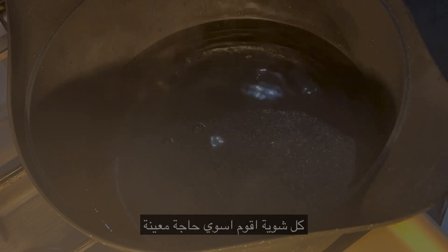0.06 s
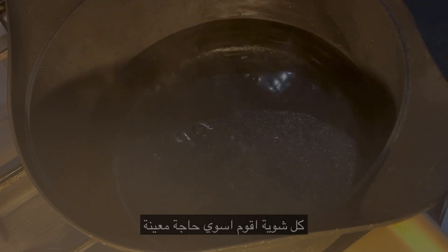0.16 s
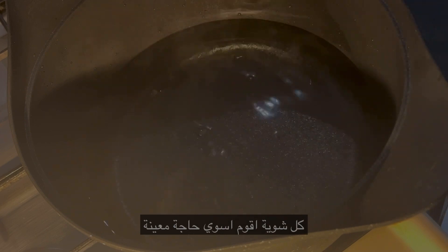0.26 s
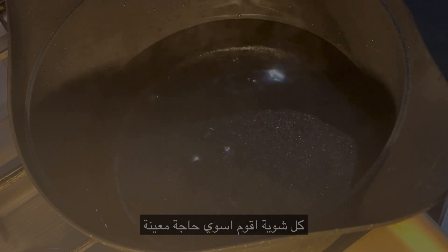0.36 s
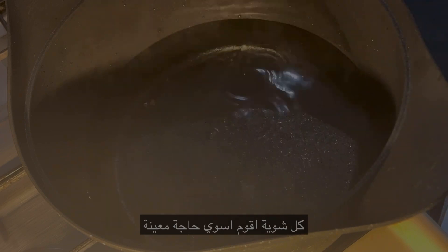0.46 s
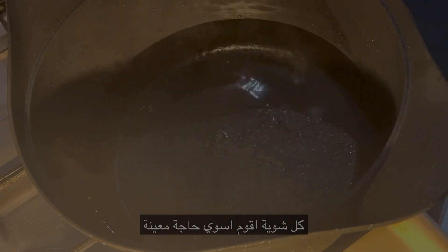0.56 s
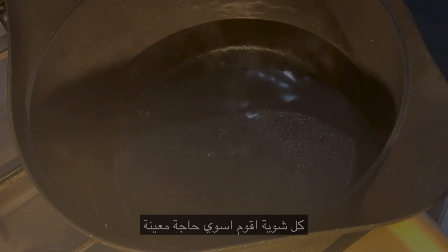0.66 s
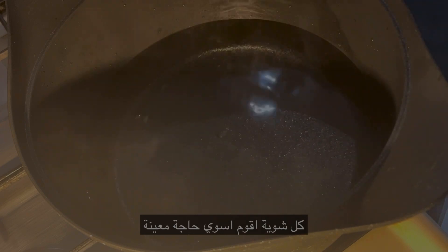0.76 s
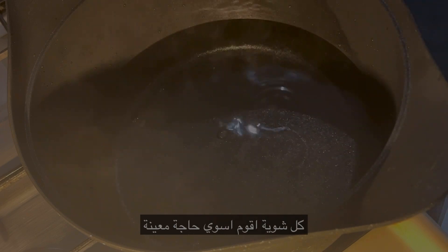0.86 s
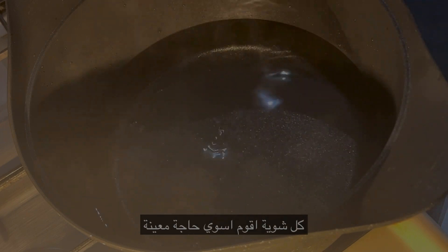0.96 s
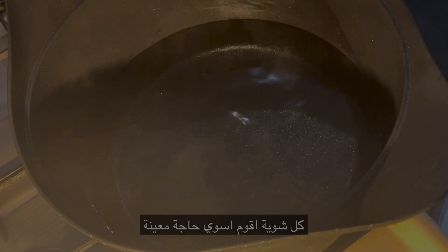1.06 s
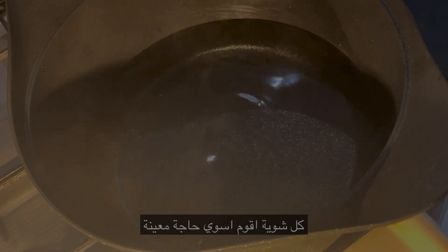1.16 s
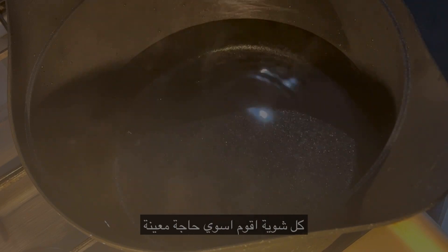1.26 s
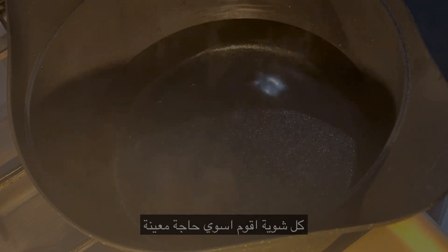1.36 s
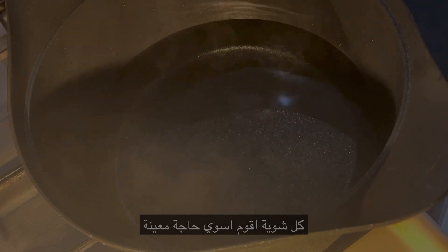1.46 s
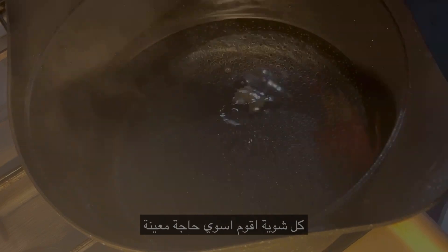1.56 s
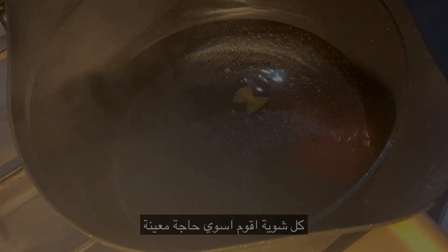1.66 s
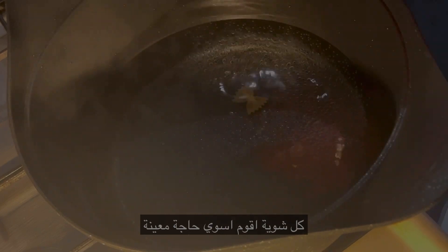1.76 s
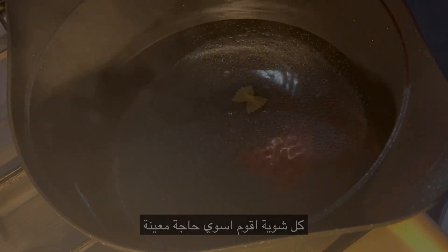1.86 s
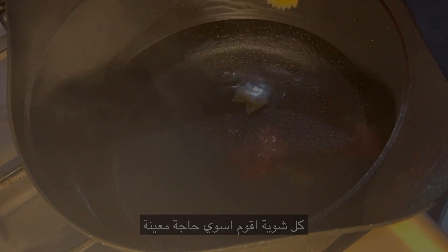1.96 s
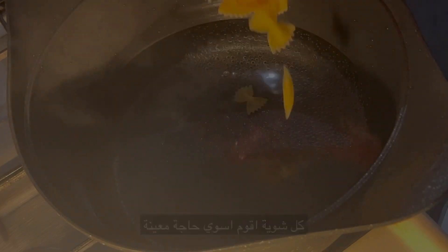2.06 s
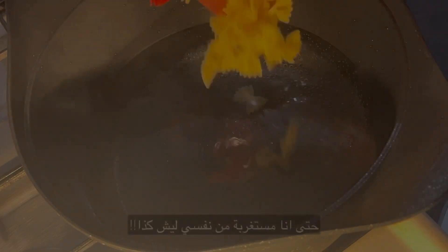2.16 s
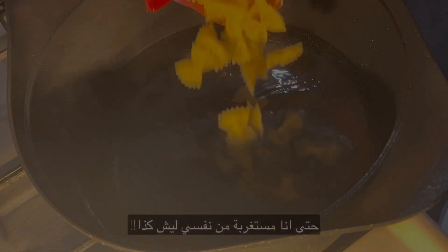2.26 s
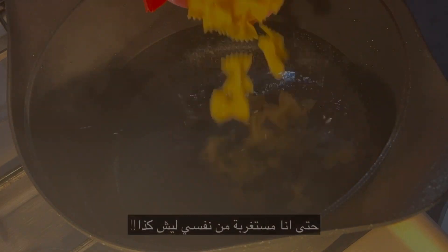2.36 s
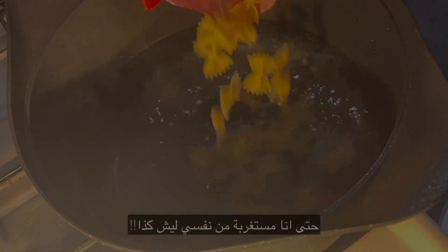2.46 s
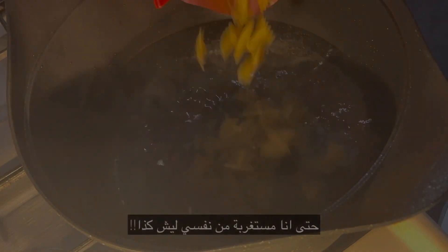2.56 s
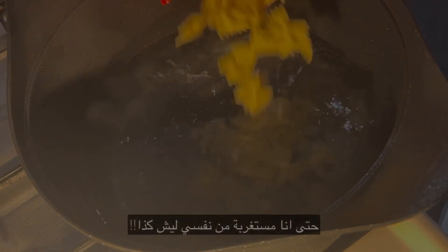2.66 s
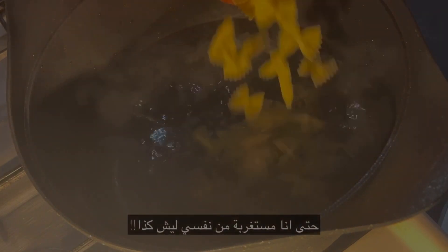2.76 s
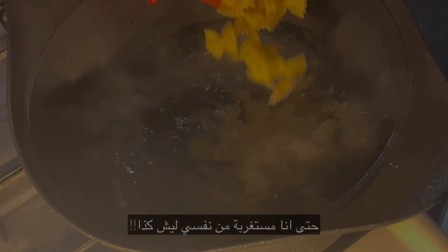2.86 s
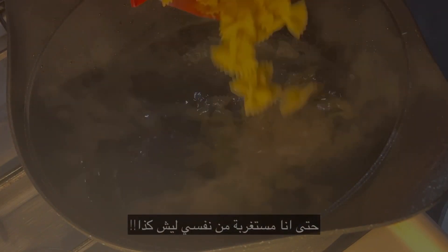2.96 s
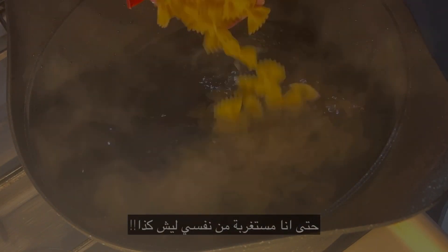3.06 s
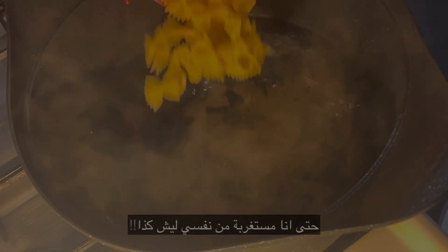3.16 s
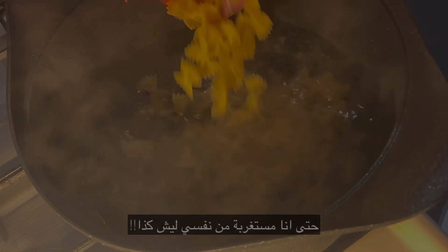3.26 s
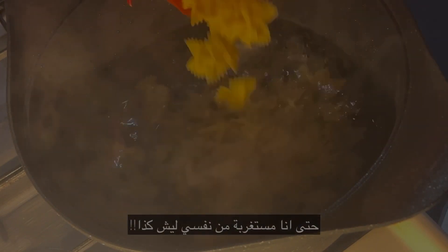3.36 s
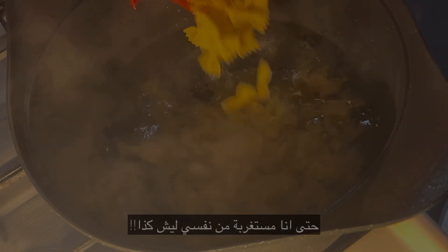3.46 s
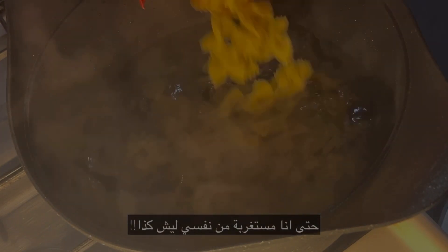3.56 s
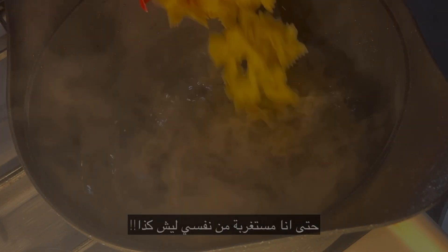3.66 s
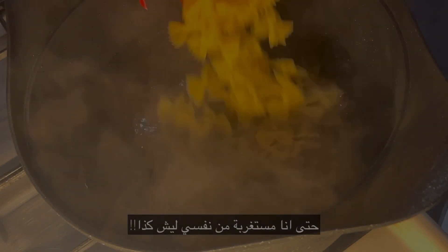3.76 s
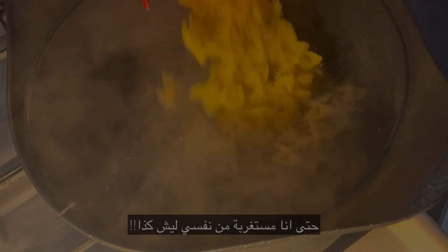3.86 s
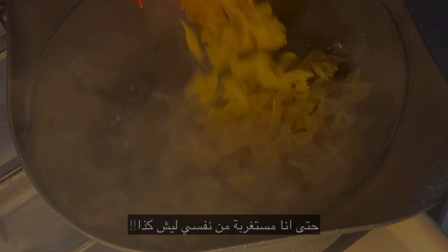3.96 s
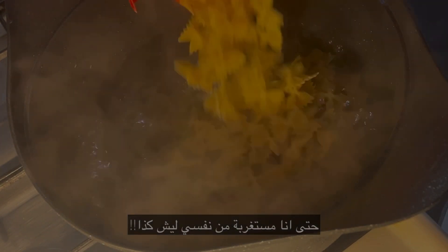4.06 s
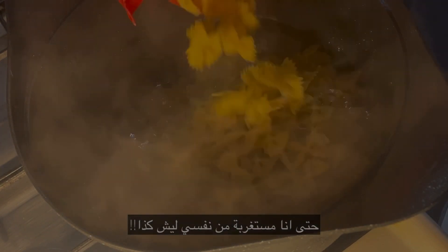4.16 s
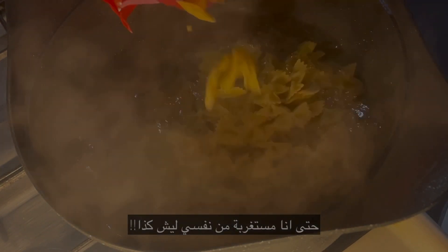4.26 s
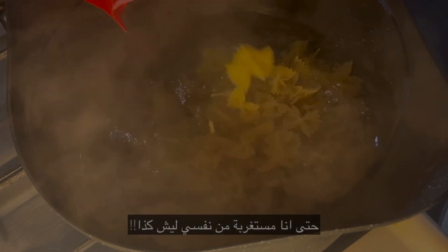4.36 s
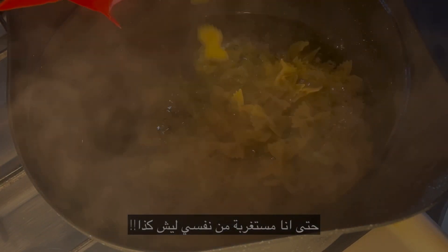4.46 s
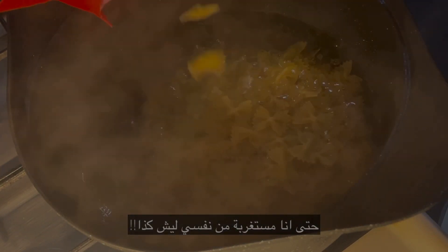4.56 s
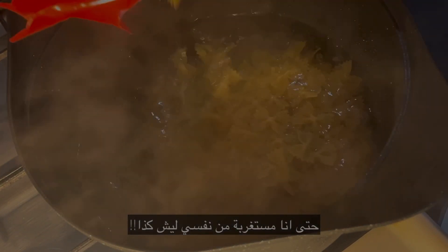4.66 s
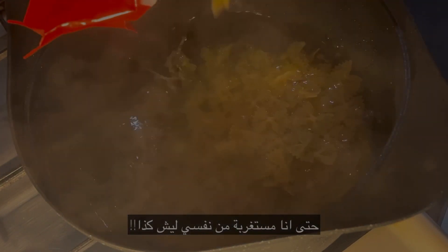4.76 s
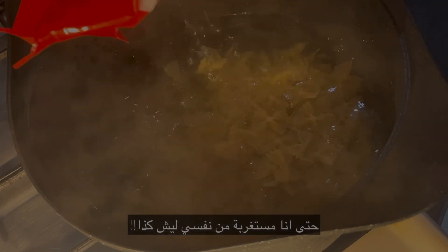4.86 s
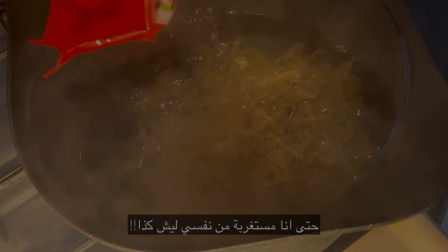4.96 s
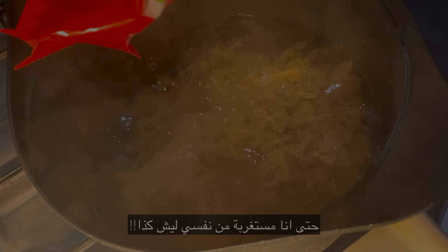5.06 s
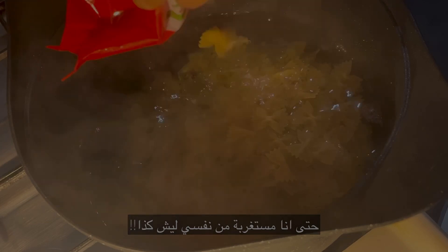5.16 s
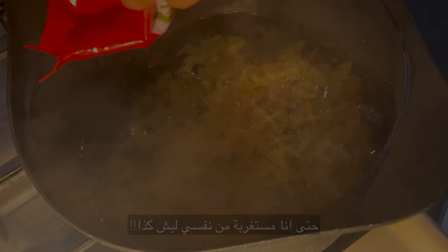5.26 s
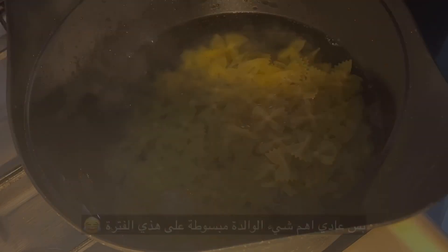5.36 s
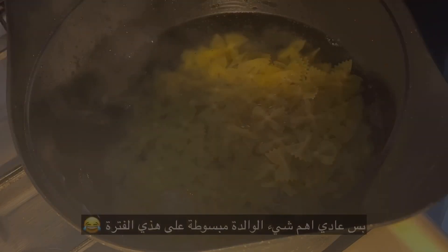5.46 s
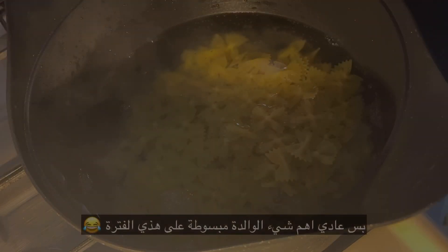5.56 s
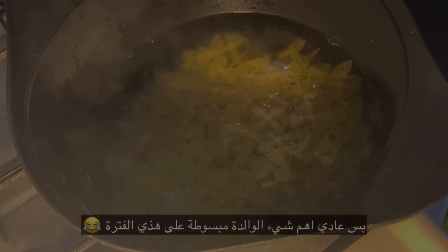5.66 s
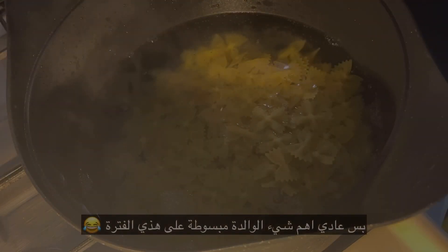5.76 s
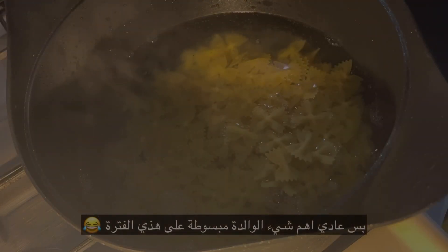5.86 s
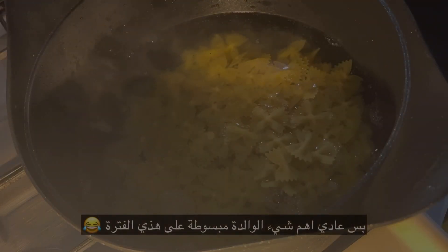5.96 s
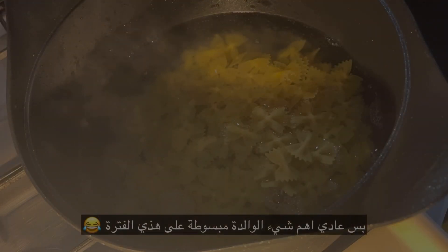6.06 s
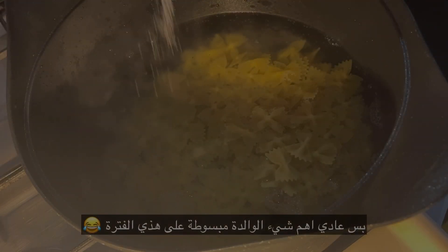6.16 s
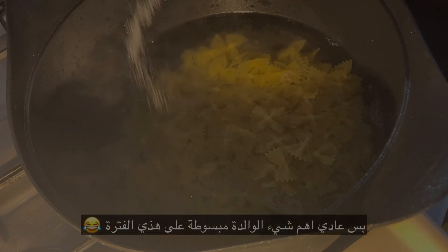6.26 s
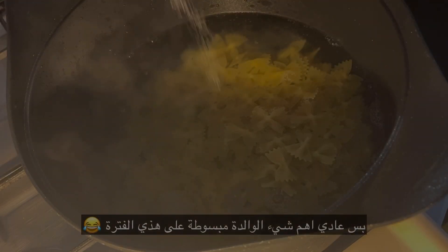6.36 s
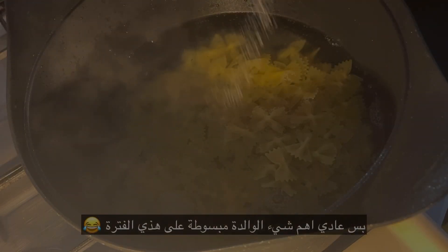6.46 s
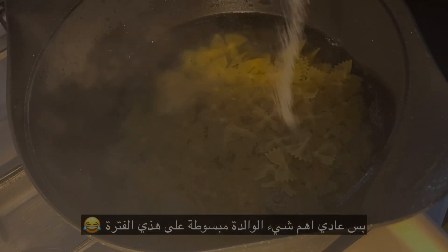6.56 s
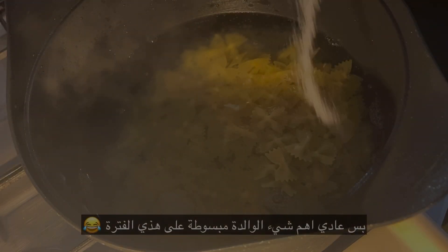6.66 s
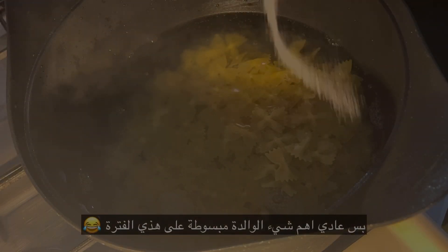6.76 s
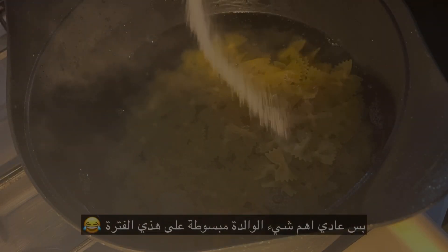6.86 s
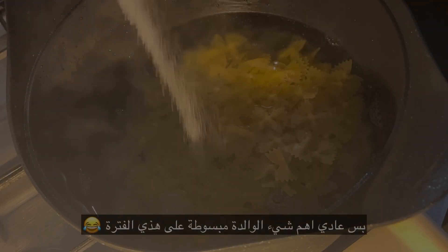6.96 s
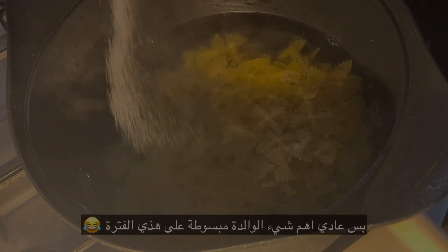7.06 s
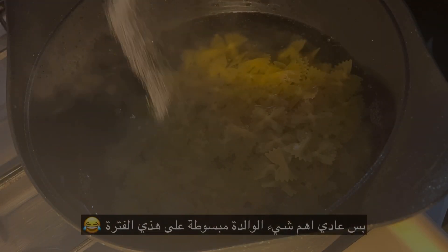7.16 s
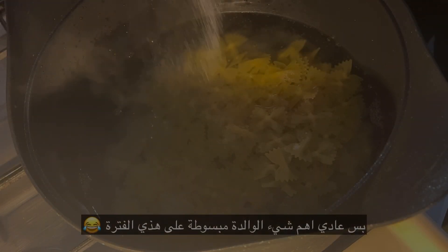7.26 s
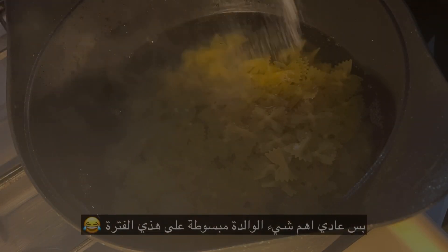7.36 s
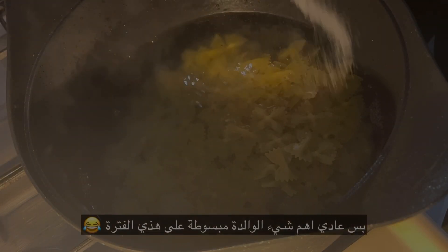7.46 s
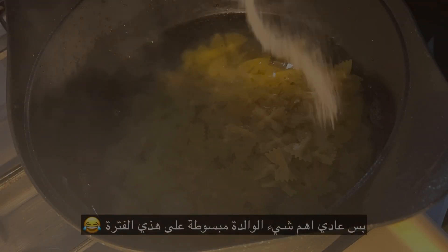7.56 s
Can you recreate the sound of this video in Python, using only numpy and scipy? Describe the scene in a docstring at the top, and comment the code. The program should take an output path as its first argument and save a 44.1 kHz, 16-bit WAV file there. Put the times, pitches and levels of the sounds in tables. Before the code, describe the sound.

Dry pasta pours from a crinkling bag into hot water, clicking against the pot, followed by a faint hiss of salt while the stove hums.

```python
"""A small kitchen: dry bow-tie pasta is tipped from a plastic bag into a pot of simmering water.
The stove hums, its burner rushes and tiny bubbles fizz. After a soft scuff, the bag is lifted with a
rustle and dull bumps, and its creases snap. Pasta rattles out, clicks on the pot and makes it ring,
then splashes in and traps air that rings as bubbles. Last, salt hisses in over the hum and the fizz.
It is all heard through two close microphone openings, called ports."""
import sys
import numpy as np
from scipy import signal
from scipy.fft import rfft, irfft, next_fast_len
from scipy.io import wavfile
from scipy.ndimage import uniform_filter1d, map_coordinates

SR = 44100
rng = np.random.default_rng(int(sys.argv[2]) if len(sys.argv) > 2 else 0)


def int16_out(signal):
    """Quantize to a 16-bit WAV file."""
    q = np.round(np.clip(np.atleast_2d(signal).T, -1, 1) * 32767)
    wavfile.write(sys.argv[1], SR, q.astype(np.int16))


N = 336218
T = np.arange(N) / SR  # the time of each sample, in seconds
LIFT_S, POUR_START_S, POUR_END_S = 0.908, 1.563, 5.32

# In all names, fade_s is the time a sound takes to die away by 60 dB.
# Levels in a table compare its rows; the functions may add a gain of their own.
# overtones of the stove's deep hum after the pour: pitch_hz, level_db
HUM_OVERTONES = [(118.4, -52.5), (177.6, -60)]
# tone colour of the burner's rush: frequency_hz, level_db
BURNER_COLOUR = [(25, -32), (48, 6), (90, 1), (140, -1), (220, -7), (320, -12), (500, -19), (750, -23),
                 (1100, -19), (1260, -15), (1450, -29), (2000, -30.5), (4000, -35), (15000, -79.5)]
# the burner's faint singing, before and after the pour ends: pitch_hz, width_hz, level_db
SINGING_BANDS = [(1232, 49, -64.5), (1320, 106, -62.5)]
# tone colour of the water's fizz: frequency_hz, level_db
FIZZ_COLOUR = [(1000, -8), (2500, -11), (5000, -2.5), (8000, -3), (12500, -3), (15500, -3)]
# swells of hiss, first from the hot water, then from salt: middle_s, length_s, level_db
HISS_SWELLS = [(0.538, 0.38, -62), (5.928, 0.26, -50), (6.147, 0.1, -52.5), (6.56, 0.3, -60.5),
               (6.907, 0.21, -59.5)]
# tone colour of the scuff: frequency_hz, level_db
SCUFF_COLOUR = [(150, -1), (450, 4), (1000, 5), (2100, -1.5), (2800, -7), (5000, -17.5), (12000, -34)]
# tugs at the bag: start_s, click_db, rustle_db, rustle_fade_s
BAG_TUGS = [(0.9082, -26.5, -42, 0.45), (1.0715, -27, -48, 0.92), (1.271, -25, -37, 0.47),
            (1.4388, -30, -37, 0.58)]
# tone colour of the bag rubbing: frequency_hz, level_db
RUB_COLOUR = [(40, -18), (100, 10.5), (250, -2), (400, 0), (600, -6), (1000, -10.5), (2000, -12),
              (4000, -18.5), (10000, -47)]
# tone colour of the bag rustling: frequency_hz, level_db
RUSTLE_COLOUR = [(500, 2.5), (1500, 1), (4500, 1), (8000, -2.5), (12500, -10), (15500, -24)]
# single pieces of pasta that hit the pot: start_s, level_db, knock_offset_db
PASTA_HITS = [(1.6315, -40, -6), (1.675, -34, -4), (1.6845, -20, -11.5), (1.7815, -28, -4),
              (1.8145, -26.5, -10), (1.8402, -23.5, -11), (1.9793, -10.5, -18), (2.064, -9.5, -12.5),
              (2.2145, -14.5, -20), (2.297, -26, -2), (2.4277, -15.5, -23), (2.4435, -13, -12.5),
              (2.4835, -25.5, -5.5), (2.6898, -17.5, -8.5), (2.7099, -11.5, -14), (2.672, -19.5, -6.5),
              (2.9188, -14.5, -5.5), (2.9324, -10.5, -18), (3.0009, -14.5, -9.5), (3.1024, -14.5, -16),
              (3.2163, -13.5, -12), (3.2345, -17, -4.5), (3.3214, -22.5, -1), (3.3909, -14, -12),
              (3.5396, -8, -24.5), (3.6775, -10.5, -15), (3.9365, -13.5, -14.5), (4.4577, -21.5, -8.5),
              (4.675, -29, -0.5), (4.7555, -22.5, -12), (4.8335, -26.5, -1.5), (4.886, -38, 3.5),
              (5.0924, -46, 5), (5.106, -38.5, 6), (5.12, -31.5, 2), (5.2051, -34.5, 6.5),
              (5.2773, -33.5, 6), (5.305, -29, -3)]
# the notes a dry piece rings with: pitch_hz, level_db, fade_s
PASTA_NOTES = [(1540, -3, 0.015), (3325, 7, 0.0039), (5030, 0, 0.011)]
# the notes of the pot above the water: pitch_hz, width_hz, level_db
POT_NOTES = [(839, 24, -3.5), (1027, 214, 3), (1853, 310, 6), (2190, 30, -3), (2945, 43, 4.5),
             (3570, 56, 0.5), (3875, 180, 2), (4150, 77, 4.5), (4690, 270, 3)]
# dull bumps against the stove: start_s, level_db, deep_offset_db, boom_offset_db
STOVE_BUMPS = [(0.986, -25, -27, 0.5), (1.052, -14.5, -5, -8.5), (1.094, -12, -2.5, -16),
               (1.192, -8, -10, -19), (1.272, 1, -4.5, -4), (1.287, -5.5, -18, -26), (1.347, -16, -29, 11),
               (1.431, -26, 3, 2), (1.52, -29.5, -6, 5.5)]
# the notes of the bumped stove, deep note first and boom second: pitch_hz, level_db, fade_s
STOVE_NOTES = [(67, 6, 0.37), (128.2, 7.5, 0.28), (102, -1, 0.15), (222, -4.5, 0.21), (292, -9, 0.18),
               (389, -15.5, 0.29), (775.5, -18.5, 0.15)]
# tone colour of a bump's knock: frequency_hz, level_db
KNOCK_COLOUR = [(100, 2), (280, -2), (520, 2), (900, -29), (2300, -3), (5000, -27), (12000, -45)]
# scrapes that start some of the bumps: start_s, level_db, fade_s, pitch_hz, width_hz
BUMP_SCRAPES = [(0.986, -39, 0.33, 750, 260), (1.094, -39, 0.39, 860, 200)]
# sharp snaps of creases in the packaging: start_s, level_db, pitch_hz, run_s
CREASE_SNAPS = [(1.193, -38, 3500, 0.0024), (1.2755, -20, 4040, 0.0026), (2.0245, -30.5, 8450, .001),
                (2.101, -16.5, 6900, 0.0045), (2.2965, -21, 7600, 0.0037), (2.3374, -18, 8000, .002),
                (2.3757, -8, 8530, .0005), (2.49, -19, 12500, .001), (2.5216, -13.5, 8500, 0.00098),
                (2.7603, -10.5, 11900, .0005), (2.841, -15.5, 9680, .002), (3.3455, -10, 7340, 0.0014),
                (3.8527, -6.5, 7740, 0.00095), (4.063, -10.5, 12800, .003), (4.1656, -14, 7900, 0.0024),
                (4.3244, -17.5, 5040, 0.0021), (4.438, -14.5, 8450, .004), (4.519, -18, 11800, 0.00064),
                (4.53, -26, 14160, .001), (4.555, -19, 11500, .002), (4.573, -32.5, 13000, .002),
                (4.5975, -20, 8700, 0.0012), (4.603, -22.5, 8600, .002), (4.628, -16, 7500, 0.00088),
                (4.635, -25, 12100, 0.0009), (4.644, -26.5, 7200, 0.0013), (4.654, -24, 8050, 0.0018),
                (4.661, -23, 4500, .001), (4.7518, -29, 12700, 0.0009), (4.755, -21, 11700, 0.0018),
                (4.8215, -26, 8000, 0.0015), (4.8345, -22.5, 11900, 0.0014), (5.143, -35, 12600, .002),
                (5.216, -23.5, 7800, 0.0025), (5.2553, -13.5, 12600, 0.00029), (6.95, -39.5, 12500, .0003)]
# the bag crinkles as it is tipped, then as it is shaken empty: start_s, stop_s, level_db
CRINKLE_SPELLS = [(1.701, 2.595, -34), (4.385, 4.71, -36.5)]
# how thickly the pasta streams from the bag: time_s, flow_db
PASTA_FLOW = [(1.64, -56.5), (1.7, -45), (1.9, -43), (2.02, -38), (2.22, -41), (2.42, -34), (2.62, -34.5),
              (2.78, -31.5), (2.98, -37), (3.17, -35.5), (3.33, -29.5), (3.51, -32), (3.6, -24.5),
              (3.9, -21.5), (4.22, -30), (4.32, -30), (4.38, -38), (4.62, -47), (4.95, -56), (5.29, -52.5)]
# tone colour of dry pasta rattling: frequency_hz, level_db
RATTLE_COLOUR = [(300, -15.5), (800, -3.5), (2000, -1.5), (2500, 4), (4200, 1.5), (6500, 0), (9500, 1),
                 (15500, -3)]
# tone colour of the splashing: frequency_hz, level_db
SPLASH_COLOUR = [(40, -11), (95, 6), (175, 1), (450, -1.5), (700, -2.5), (1100, 0), (1900, -5.5),
                 (3000, -32), (8000, -53)]
# clumps of pieces that land together: start_s, rattle_db, pot_db, splash_db
PASTA_CLUMPS = [(1.777, -51, -58, -33.5), (1.922, -48, -52, -35.5), (1.994, -37.5, -41, -28.5),
                (2.068, -40, -50, -35), (2.297, -41.5, -42, -47), (2.38, -36, -48, -40),
                (2.512, -30.5, -30.5, -33.5), (2.562, -33.5, -30, -25.5), (2.667, -29, -27.5, -31),
                (2.768, -23.5, -25, -31), (2.824, -21.5, -29, -41), (2.846, -33.5, -29, -34),
                (2.917, -23, -29, -24.5), (3.236, -26, -25, -35), (3.283, -27, -32, -37.5),
                (3.324, -21, -25, -46), (3.447, -18.5, -22.5, -34), (3.535, -19.5, -28, -29),
                (3.69, -22.5, -19.5, -36.5), (3.776, -17.5, -19.5, -29.5), (3.855, -17, -21.5, -31),
                (3.896, -35.5, -29.5, -28.5), (3.935, -19.5, -25.5, -39.5), (4.02, -21, -25, -49),
                (4.059, -20.5, -21, -42), (4.09, -16, -24.5, -32.5), (4.157, -18, -21.5, -32),
                (4.255, -21.5, -24.5, -42), (4.301, -21.5, -39, -49), (4.412, -25, -37, -52)]
# pieces that ring clearly on a hard edge: start_s, level_db, pitch_hz
PASTA_PINGS = [(1.979, -23.5, 3230), (2.2148, -27, 3280), (2.339, -22.5, 4570), (2.427, -19, 5130),
               (2.692, -17, 3300), (3.679, -13.5, 4300), (4.628, -25, 3820)]
# larger air pockets pulled under by falling pieces: start_s, level_db, pitch_hz
AIR_POCKETS = [(1.984, -18.5, 1430), (2.447, -22, 262), (2.4824, -18, 1110), (3.235, -27, 960),
               (4.462, -24, 1040), (4.833, -22, 1480), (4.834, -27.5, 1050), (5.023, -33.5, 288),
               (5.283, -24, 1490), (5.307, -27, 1000)]
# how long the kitchen echoes: frequency_hz, fade_s
ECHO_FADES = [(150, 0.72), (1000, 0.37), (4000, 0.092), (14000, 0.013)]
# how far the wave at the left port runs ahead of the right: frequency_hz, lead_radians
PORT_LEAD = [(0, 0), (400, -.55), (900, -.25), (1810, .05), (2580, 2.4), (3300, 1.2), (3900, .9),
             (4600, 1.45), (5150, 1.4), (5900, 3.14), (6700, 4.3), (7700, 6.25), (8400, 6.3), (9700, 9.3),
             (10700, 9.5), (11850, 12.5), (13000, 12.6), (14000, 15.4), (15700, 16.2)]
# level at the left port compared with the right: frequency_hz, offset_db
PORT_LEVELS = [(200, 0), (450, -1.3), (750, -2.2), (1100, -1.2), (1600, 0)]


def amp(db):
    """Turn decibels into a gain to multiply by."""
    return 10 ** (np.asarray(db) / 20)


def fade(t, fade_s, level_db=0):
    """A gain that starts at level_db and drops 60 dB every fade_s."""
    return amp(level_db - 60 * t / fade_s)


def rise(t, rise_s):
    """A gain that climbs from 0 towards 1, most of the way within rise_s."""
    return 1 - np.exp(-t / rise_s)


def burst(start_s, rise_s, fade_s):
    """A gain that rises at start_s and dies away."""
    age = np.maximum(T - start_s, 0)
    return rise(age, rise_s) * fade(age, fade_s)


def sine(hz, t):
    """A pure tone."""
    return np.sin(2 * np.pi * hz * t)


def unit(x):
    """Scale a sound to an average (rms) level of 1."""
    return x / np.sqrt(np.mean(x ** 2) + 1e-20)


def unit_energy(x):
    """Scale a short sound to an energy of 1, averaged over the ports."""
    return unit(x) / np.sqrt(x.shape[-1])


def along(points, hz):
    """Read between the rows of a (frequency_hz, value) table, on a log frequency scale."""
    frequencies, values = np.transpose(points)
    return np.interp(np.log(hz + 1), np.log(frequencies + 1), values)


def between(start_s, stop_s):
    """A gain of 1 between two times and 0 outside, with quick edges."""
    return uniform_filter1d(((T >= start_s) & (T < stop_s)) * 1., size=200)


def wobble(per_s):
    """A smooth curve through per_s random values a second."""
    return map_coordinates(rng.standard_normal(int(N * per_s / SR) + 4), [T * per_s])


def add(track, start_s, sound):
    """Mix a sound into a track at start_s."""
    stretch = track[..., max(round(start_s * SR), 0):][..., :sound.shape[-1]]
    stretch += sound[..., :stretch.shape[-1]]


def filtered(x, response):
    """Multiply each frequency in a sound by response(hz)."""
    size = next_fast_len(N + SR // 4)
    return irfft(rfft(x, size) * response(np.fft.rfftfreq(size, 1 / SR)), size)[..., :N]


def coloured(x, colour):
    """Give a sound a tone colour and an average level of 1."""
    return unit(filtered(x, lambda hz: amp(along(colour, hz))))


def noise(size=N):
    """White noise at the two ports, mostly shared."""
    return rng.standard_normal(size) + amp(-5) * rng.standard_normal((2, size))


def narrow_noise(hz, width_hz, size=N):
    """Noise gathered around one pitch."""
    return unit(signal.lfilter(*signal.iirpeak(hz, hz / width_hz, SR), rng.standard_normal(size)))


def grains(per_s, low_hz, high_hz, cycles, spread_db, size, glide=0):
    """Tiny random rings, size samples each; more per second makes them denser but no louder."""
    per_s = per_s * np.ones(N)
    starts = np.flatnonzero(rng.random(N) < per_s / SR)
    place, strength, life = rng.random((len(starts), 3)).astype(np.float32).T[:, :, None]
    hz = low_hz + (high_hz - low_hz) * place
    t = np.arange(size, dtype=np.float32) / SR
    age = t * hz / (cycles * (.5 + life))
    rings = sine(hz * (1 + glide * rise(age, 2)), t) * np.exp(-age)
    level_db = spread_db * np.minimum(-np.log(1 - strength), np.pi)
    rings *= amp(level_db) / np.linalg.norm(rings, axis=1, keepdims=True)
    rings /= np.sqrt(per_s[starts, None])
    samples = starts[:, None] + np.arange(size)
    return unit(np.bincount(samples.ravel(), rings.ravel(), N + size)[:N])


def stove_hum(mains_hz=59.2, beat_hz=3.02):
    """The stove buzzes at multiples of the mains frequency, deeper after the pour; its burner rushes."""
    def tone(hz, db):
        return np.sqrt(2) * amp(db) * np.sin(2 * np.pi * hz * T + .25 * wobble(5))

    # the buzz throbs evenly until the bag is lifted, then wavers at a lower level
    beat = 1 + 0.56 * np.cos(2 * np.pi * beat_hz * T)
    buzz_gain = np.where(T < LIFT_S, amp(-45) * beat, amp(-49 + wobble(13)))
    buzz = buzz_gain * (tone(2 * mains_hz, 0) + tone(3 * mains_hz, -15))
    deep_db = -40 + 0.31 * wobble(4.18) - 2.5 * np.maximum(T - POUR_END_S, 0)  # sinks 2.5 dB a second
    hum = tone(mains_hz, deep_db) + sum(tone(hz, db + 0.3 * wobble(2.7)) for hz, db in HUM_OVERTONES)
    rush = amp(np.where(T < POUR_END_S, -46, -46.5)) * coloured(noise(), BURNER_COLOUR)
    after = between(POUR_END_S, np.inf)
    return (1 - after) * buzz + after * hum + rush


def burner_singing():
    """The burner sings faintly in a narrow band of noise, a little higher once the pour is over."""
    before, after = [amp(db) * narrow_noise(hz, width_hz) for hz, width_hz, db in SINGING_BANDS]
    band = signal.butter(2, [900, 1700], "band", fs=SR, output="sos")
    return signal.sosfilt(band, np.where(T < POUR_END_S, before, after))


def water_fizz():
    """Tiny bubbles burst in the hot water; the hiss swells and fades, most when salt is added."""
    steady = amp(np.where(T < POUR_END_S, -71.5, -64.5) + 0.29 * wobble(6.6))
    swells = sum(amp(db) * np.exp(-np.abs(2 * (T - middle_s) / length_s) ** 3)
                 for middle_s, length_s, db in HISS_SWELLS)
    pops = grains(2500, 2200, 13500, cycles=5.1, spread_db=1.5, size=150)
    return np.hypot(steady, swells) * coloured(pops + noise(), FIZZ_COLOUR)


def scuff(start_s=0.107):
    """A soft, dull scuff somewhere in the kitchen: a tap and a longer fade."""
    tap = amp(-49) * burst(start_s, rise_s=0.001, fade_s=0.018)
    tail = amp(-43) * burst(start_s, rise_s=0.0036, fade_s=0.77)
    return (tap + tail) * coloured(noise(), SCUFF_COLOUR)


def bag_rub(free_s=1.327, rise_db_per_s=46, fall_db_per_s=57):
    """The lifted bag rubs hardest as it comes free, with extra rubbing after each bump."""
    drag = amp(-29.5 - np.maximum(rise_db_per_s * (free_s - T), fall_db_per_s * (T - free_s)))
    jolts = sum(amp(db - 24.5) * burst(start_s, rise_s=0.004, fade_s=0.24)
                for start_s, db, _, _ in STOVE_BUMPS)
    rough_noise = noise() * amp(0.87 * wobble(110))
    return np.hypot(drag, jolts) * coloured(rough_noise, RUB_COLOUR)


def bag_rustle():
    """Each tug sets off a dying rustle of tiny crackles in the plastic."""
    crackles = grains(1500, 1000, 15000, cycles=2.5, spread_db=3, size=200)
    tugs = sum(amp(db) * burst(start_s, 0.0077, fade_s) for start_s, _, db, fade_s in BAG_TUGS)
    return tugs * coloured(crackles + noise(), RUSTLE_COLOUR)


def pot_ring(x):
    """The pot rings at its own notes when a sound strikes it."""
    return filtered(x, lambda hz: sum(
        amp(db) * 1j * hz * width_hz / (note_hz ** 2 - hz ** 2 + 1j * hz * width_hz)
        for note_hz, width_hz, db in POT_NOTES))


def clicks(hits):
    """Each hit cracks, rings and knocks the pot, bounces once and makes a small splash."""
    cracks, knocks, splashes = np.zeros((2, N)), np.zeros(N), np.zeros(N)
    t = np.arange(SR // 25) / SR
    for start_s, db, knock_db in hits:
        bounce_s = rng.uniform(.001, .003)
        for contact_s, contact_db in [(start_s, db), (start_s + bounce_s, db - 7)]:
            crack = noise(len(t)) * (fade(t, .0045) + fade(t, .025, -21))
            ring = sum(fade(t, fade_s, note_db) * sine(hz * np.exp(0.1 * rng.standard_normal()), t)
                       for hz, note_db, fade_s in PASTA_NOTES)
            click = unit_energy((crack + 0.91 * ring) * rise(t, .0001))
            add(cracks, contact_s, amp(contact_db + 11.5) * click)
            knock = rng.standard_normal(len(t)) * fade(t, 0.015, contact_db + knock_db + 4.5)
            add(knocks, contact_s, knock)
        # each splash traps three small bubbles, each with its own pitch
        for wait_s, detune in zip(rng.exponential(0.001936, 3), rng.standard_normal(3)):
            bubble = sine(1400 * np.exp(0.267 * detune), t) * fade(t, 0.013, db + knock_db - 2)
            add(splashes, start_s + wait_s, bubble)
    thin_cracks = filtered(cracks, lambda hz: hz / np.hypot(hz, 1400))  # turns the bass down
    return thin_cracks + pot_ring(knocks) + splashes


def stove_bumps(hand_s=1.408):
    """Each bump knocks and makes the stove boom; at hand_s a hand stills the earlier booms."""
    booms, knock_gain, t = np.zeros(N), np.zeros(N), np.arange(SR // 2) / SR
    for start_s, db, deep_db, boom_db in STOVE_BUMPS:
        offsets_db = [deep_db, boom_db] + [0] * (len(STOVE_NOTES) - 2)
        ring = sum(fade(t, fade_s, note_db + offset_db) * sine(hz, t)
                   for (hz, note_db, fade_s), offset_db in zip(STOVE_NOTES, offsets_db))
        held = np.clip((start_s + t - hand_s) / 0.038, 0, 1) * (start_s < hand_s)
        add(booms, start_s, amp(db - 10.5 - 19 * held) * ring * rise(t, 0.0068))
        add(knock_gain, start_s, fade(t, 0.059, -24.5 + 0.88 * db))
    return booms + knock_gain * coloured(noise(), KNOCK_COLOUR)


def scrapes():
    """Some bumps start with a short, rasping scrape."""
    out, t = np.zeros(N), np.arange(SR // 2) / SR
    for start_s, db, fade_s, hz, width_hz in BUMP_SCRAPES:
        add(out, start_s, fade(t, fade_s, db) * narrow_noise(hz, width_hz, len(t)))
    return out


def plastic_snaps(crinkles_per_s=28):
    """A crease gives way in three quick slips, each with a crack and a pitch of its own."""
    out, t = np.zeros((2, N)), np.arange(SR // 30) / SR
    creases = list(CREASE_SNAPS)
    for start_s, stop_s, db in CRINKLE_SPELLS:  # faint extra creases while the bag is moved
        length_s = stop_s - start_s
        for when, size, pitch in rng.random((round(crinkles_per_s * length_s), 3)):
            creases.append((start_s + when * length_s, db + 2 * size - 1, 5000 + 8000 * pitch, .002))
    crack_gain = fade(t, .004) + fade(t, .026, -23)  # the sheet shivers after the crack
    ring_gain = fade(t, 0.0029, 7)
    for start_s, db, hz, run_s in creases:
        snap = np.zeros((2, len(t)))
        for place, (size, detune) in zip([0, rng.random(), 1], rng.standard_normal((3, 2))):
            slip = noise(len(t)) * crack_gain + ring_gain * sine(hz * np.exp(0.074 * detune), t)
            add(snap, place * run_s, amp(2 * size) * slip)
        add(out, start_s, amp(db + 13.5) * unit_energy(snap))
    return filtered(out, lambda hz: hz / np.hypot(hz, 2400))  # turns the bass down


def pasta_pour(full_flow_db=-21, heap_s=3.85):
    """Pasta rattles out, rings the pot and splashes; a heavier flow is louder, brighter and denser."""
    flow_db = np.interp(T, *np.transpose(PASTA_FLOW)) - full_flow_db
    flow = amp(.4 * np.minimum(flow_db, 0))
    strike_share = np.clip(.25 + .75 * flow, 0, .85)  # faster pieces strike more and slide less

    def strike_and_slide(hits):
        return np.sqrt(strike_share) * hits + np.sqrt(1 - strike_share) * noise()

    contacts = grains(500 + 2600 * flow, 732, 14480, cycles=1.86, spread_db=-1.5, size=320)
    # pieces land in bunches, which overlap and even out in a thick stream
    bunching = amp((1.2 - flow) * (3 * wobble(170) + 1.6 * wobble(35)))
    clatter = unit(strike_and_slide(contacts) * bunching)
    bright = coloured(clatter, RATTLE_COLOUR)
    dull = filtered(bright, lambda hz: 1 / np.hypot(1, hz / 5500))
    rattle = amp(-20 + flow_db) * (dull + (bright - dull) * flow ** .5)
    bubbles = grains(500 + 900 * flow, 171, 2410, cycles=1.15, spread_db=1.5, size=800, glide=0.14)
    water = coloured(strike_and_slide(bubbles) * bunching, SPLASH_COLOUR)
    heap = np.clip((T - heap_s) / 0.092, 0, 1)  # once the heap breaks the surface, pieces splash less
    splash = amp(-33 + 0.49 * flow_db - 3.5 * heap) * water
    small_bubbles = grains(130, 784, 2097, cycles=12, spread_db=13, size=1600, glide=0.082)
    ringing = amp(-30 + 0.89 * flow_db) * (unit(pot_ring(clatter)) + amp(-7.5) * small_bubbles)
    return (rattle + ringing + splash) * between(POUR_START_S, POUR_END_S)


def stray_hits(per_s=5, knock_offset_db=-7):
    """Stray pieces land at random, louder in a thicker flow; gives rows like those of PASTA_HITS."""
    length_s = POUR_END_S - POUR_START_S
    when, size = rng.random((round(per_s * length_s), 2)).T
    starts_s = POUR_START_S + length_s * when
    flow_db = np.interp(starts_s, *np.transpose(PASTA_FLOW))
    levels_db = np.minimum(flow_db + 8, -12) + 4 * (2 * size - 1)
    return [(start_s, db, knock_offset_db) for start_s, db in zip(starts_s, levels_db)]


def pasta_clumps():
    """A clump lands all at once: it rattles, rings the pot and stirs up a splash of bubbles."""
    gains, t = np.zeros((3, N)), np.arange(SR // 6) / SR
    shape = rise(t, 0.0043) * fade(t, 0.12)
    for start_s, *levels_db in PASTA_CLUMPS:
        add(gains, start_s, amp(levels_db)[:, None] * shape)
    ticks = grains(1000, 2840, 14900, cycles=3.2, spread_db=1.5, size=200)
    rattle = coloured(ticks + amp(-11) * noise(), RATTLE_COLOUR)
    ringing = unit(pot_ring(grains(1200, 910, 2320, cycles=2.8, spread_db=0.5, size=400)))
    bubbles = grains(450, 240, 895, cycles=2.3, spread_db=-1, size=800, glide=0.11)
    return gains[0] * rattle + gains[1] * ringing + gains[2] * bubbles


def pasta_pings():
    """A piece that hits a hard edge rings with one clear, very short note."""
    out, t = np.zeros(N), np.arange(SR // 20) / SR
    for start_s, db, hz in PASTA_PINGS:
        add(out, start_s, fade(t, 0.02, db) * sine(hz, t))
    return out


def bubble_plops():
    """A trapped pocket of air rings for a few cycles and rises a little in pitch."""
    out, t = np.zeros(N), np.arange(SR // 12) / SR
    for start_s, db, hz in AIR_POCKETS:
        shape = rise(t, 0.00024) * np.exp(-t * hz / 2)
        add(out, start_s + 0.00135, amp(db + 3) * shape * sine(hz * (1 + 1.2 * t), t))
    return out


def kitchen_echo(x):
    """The room answers with a short wash of sound, different at each port and with little bass."""
    hz, t, spectrum = signal.stft(rng.standard_normal((2, SR // 3)), SR, nperseg=256)
    tail = signal.istft(spectrum * fade(t, along(ECHO_FADES, hz)[:, None]), SR, nperseg=256)[1]
    delayed = np.pad(x.mean(axis=0), (150, 0))[None]
    echo = signal.fftconvolve(delayed, tail / np.linalg.norm(tail[0]), axes=1)[:, :N]
    return filtered(echo, lambda hz: hz ** 4 / (hz ** 4 + 260 ** 4))


def scene():
    """Mix it all; the lifting sounds break off short at 1.563 s, and the echo breaks off short at 5.32 s."""
    tug_hits = [(start_s, db, -5) for start_s, db, _, _ in BAG_TUGS]  # a tug clicks like a piece of pasta
    sharp = clicks(PASTA_HITS + stray_hits() + tug_hits)
    sharp += plastic_snaps() + pasta_pings() + bubble_plops()
    noisy = pasta_pour() + pasta_clumps() + scuff()
    lifting = (bag_rub() + bag_rustle() + stove_bumps() + scrapes()) * between(LIFT_S, POUR_START_S)
    echo = kitchen_echo(amp(-12) * sharp + amp(-15) * noisy) * between(0, POUR_END_S)
    return sharp + noisy + lifting + echo + stove_hum() + burner_singing() + water_fizz()


def record(dry, peak_limit=.7, bottom_hz=42, top_hz=15850):
    """The ports share the bass, the left leads in the treble; peaks are rounded, extreme pitches lost."""
    def port_response(hz):
        lead = np.interp(hz, *np.transpose(PORT_LEAD))
        left = np.exp(.5j * lead) * amp(along(PORT_LEVELS, hz) / 2)  # each port takes half the offset
        low_cut = hz ** 6 / (hz ** 6 + bottom_hz ** 6)
        return np.array([left, 1 / left]) * low_cut * (hz < top_hz)

    middle = dry.mean(axis=0)
    pair = middle + filtered(dry - middle, lambda hz: hz ** 3 / (hz ** 3 + 230 ** 3))
    rounded = pair / (1 + np.abs(pair / peak_limit) ** 4) ** .25
    return filtered(rounded, port_response)


dry = scene()
out = record(dry)
int16_out(out)
```